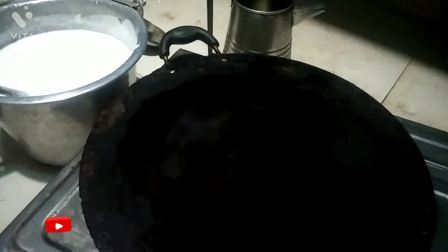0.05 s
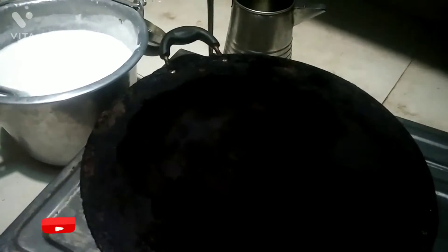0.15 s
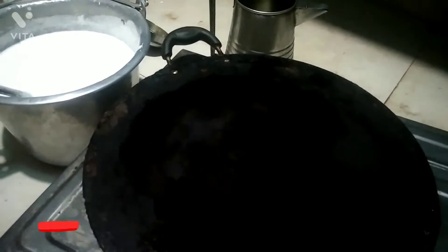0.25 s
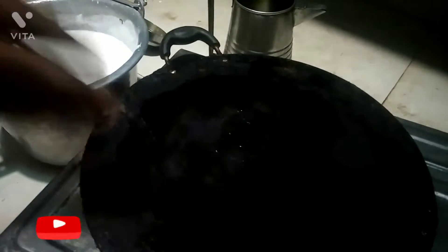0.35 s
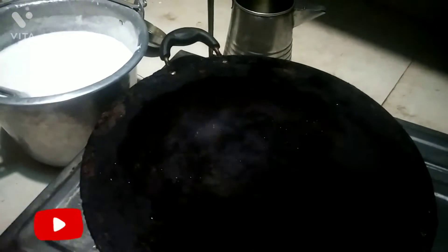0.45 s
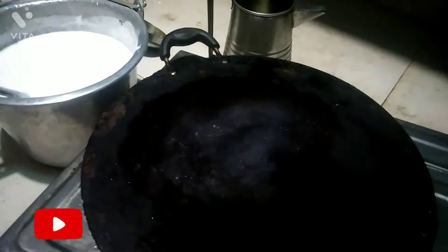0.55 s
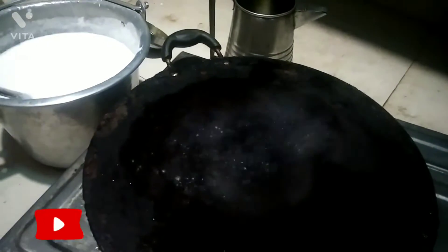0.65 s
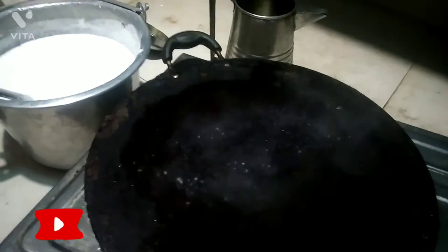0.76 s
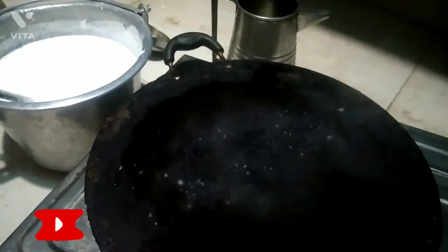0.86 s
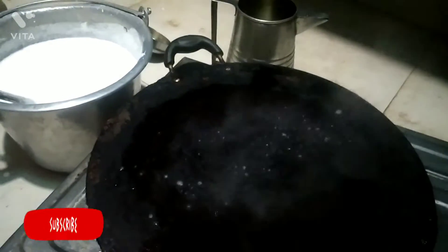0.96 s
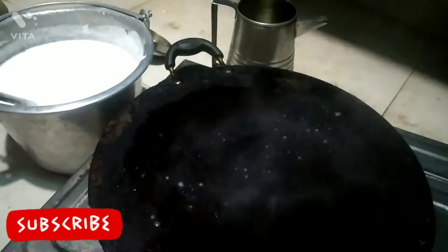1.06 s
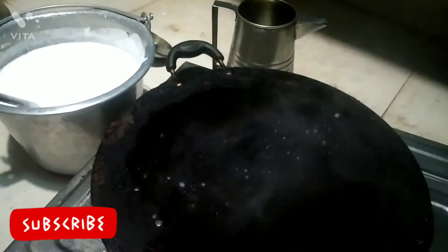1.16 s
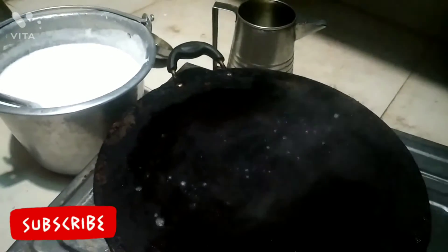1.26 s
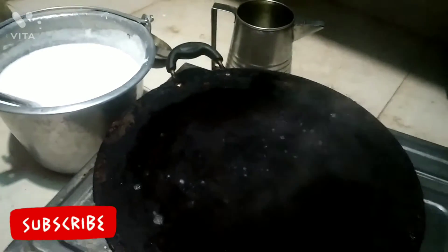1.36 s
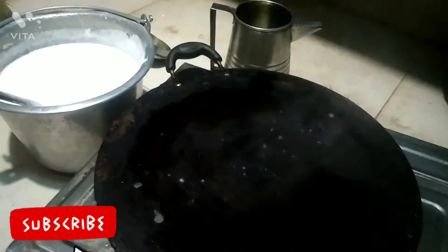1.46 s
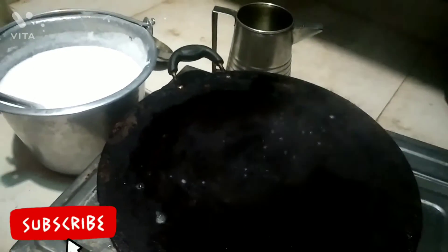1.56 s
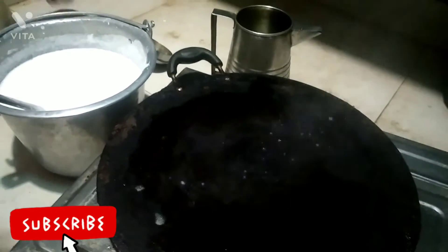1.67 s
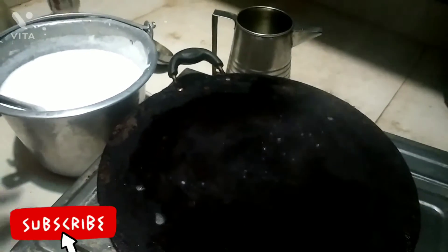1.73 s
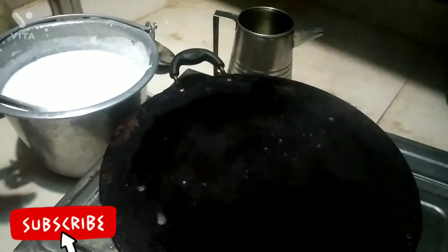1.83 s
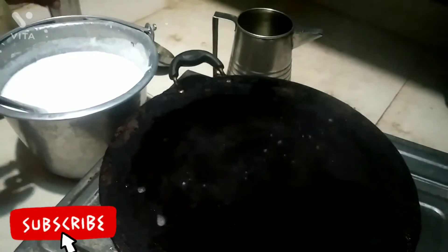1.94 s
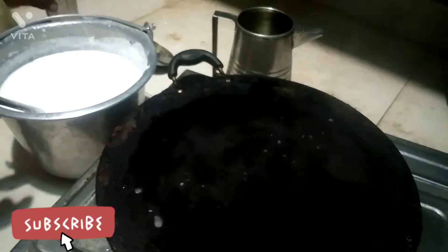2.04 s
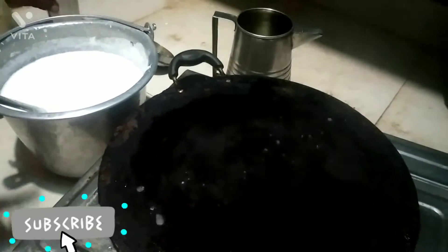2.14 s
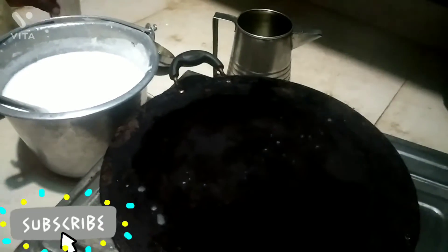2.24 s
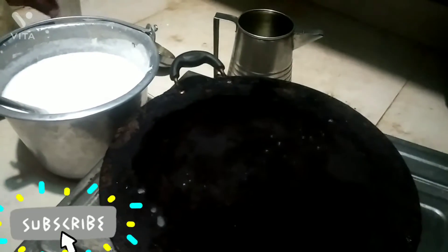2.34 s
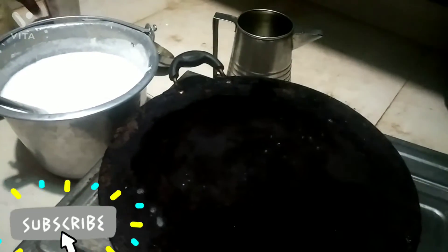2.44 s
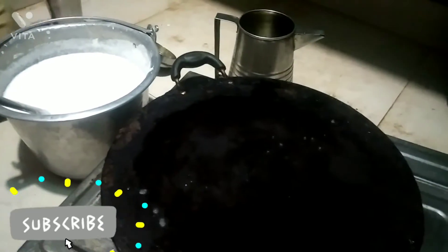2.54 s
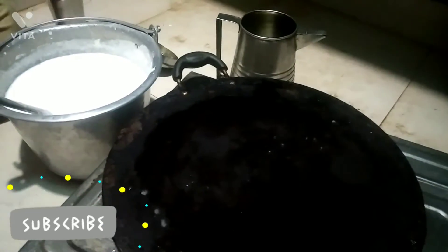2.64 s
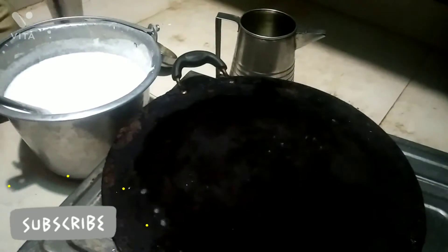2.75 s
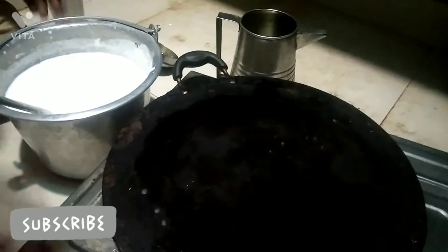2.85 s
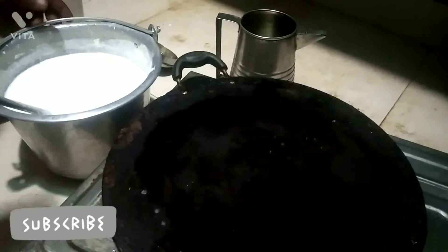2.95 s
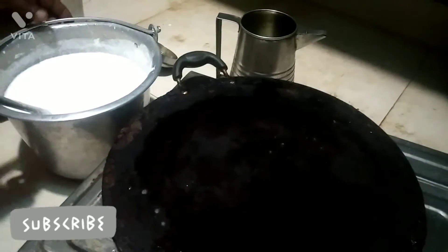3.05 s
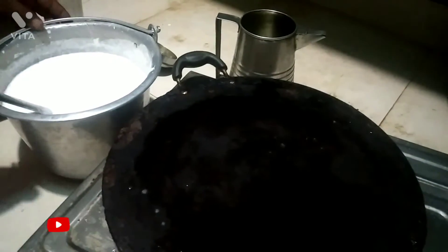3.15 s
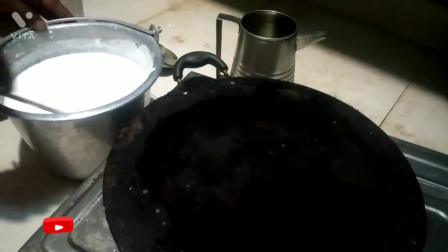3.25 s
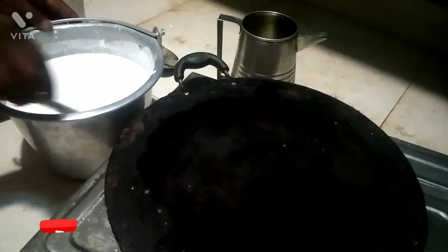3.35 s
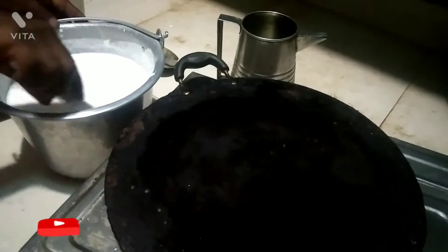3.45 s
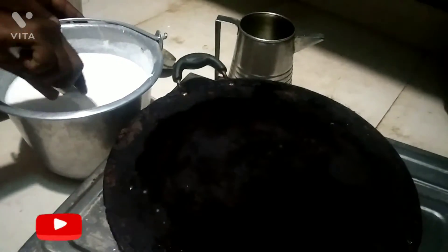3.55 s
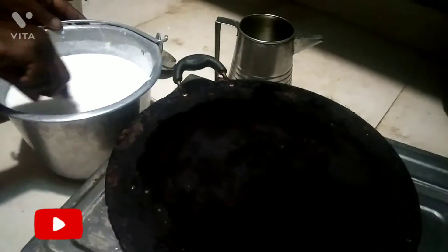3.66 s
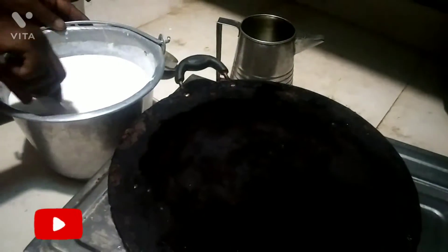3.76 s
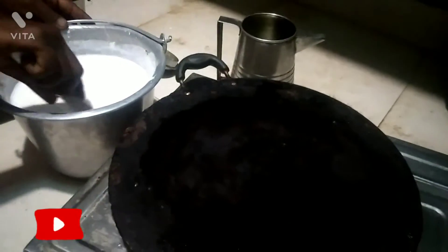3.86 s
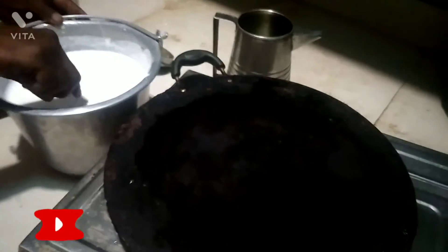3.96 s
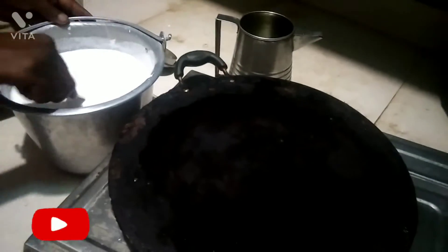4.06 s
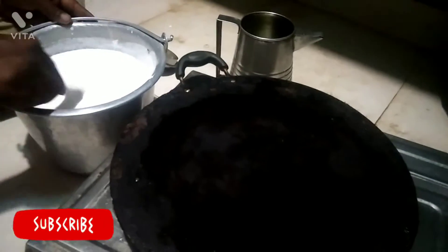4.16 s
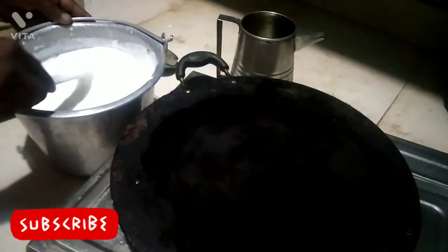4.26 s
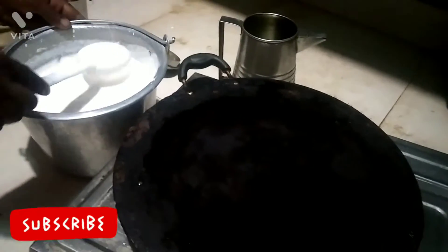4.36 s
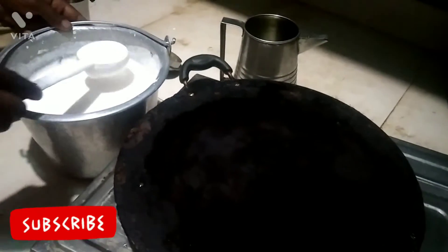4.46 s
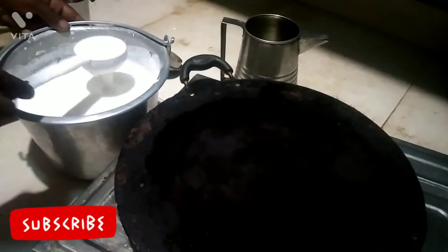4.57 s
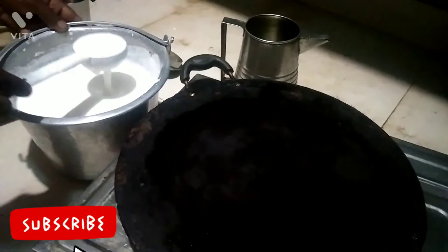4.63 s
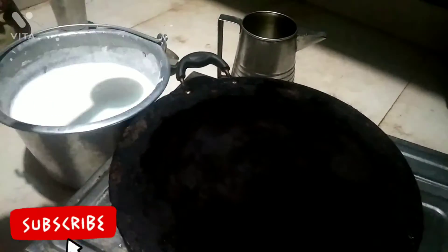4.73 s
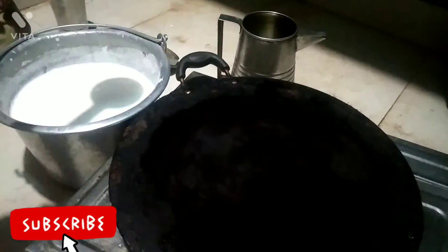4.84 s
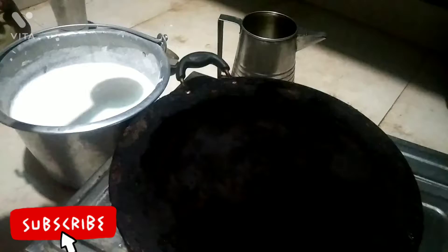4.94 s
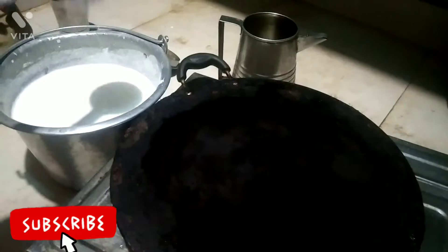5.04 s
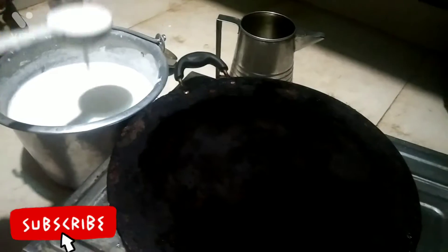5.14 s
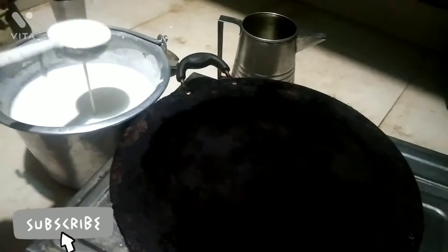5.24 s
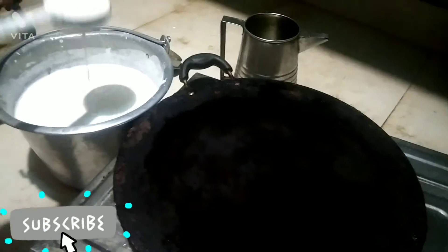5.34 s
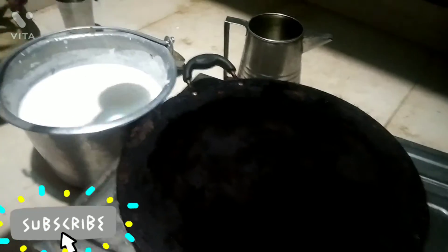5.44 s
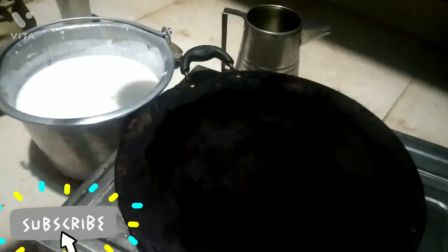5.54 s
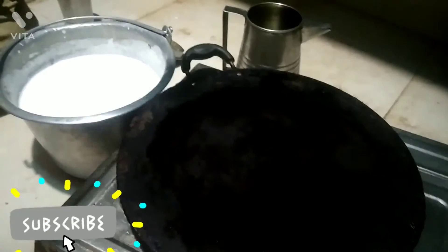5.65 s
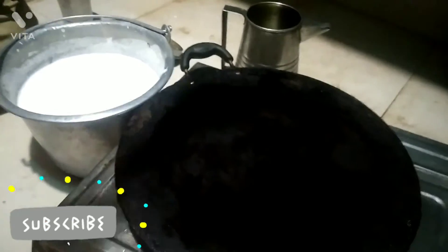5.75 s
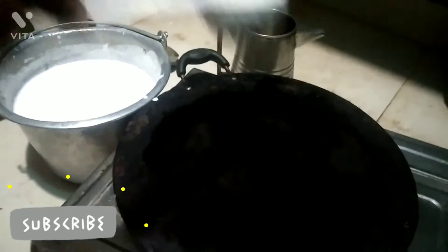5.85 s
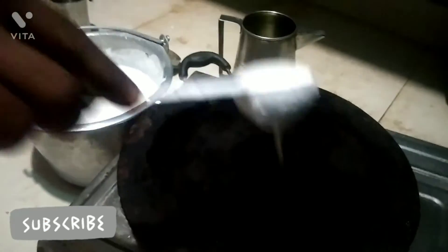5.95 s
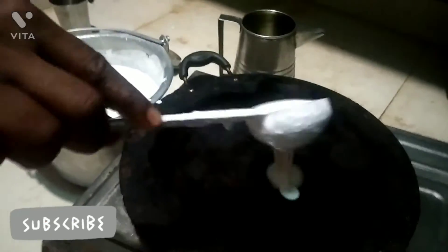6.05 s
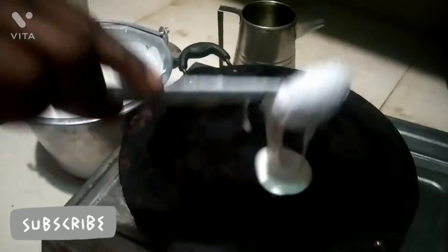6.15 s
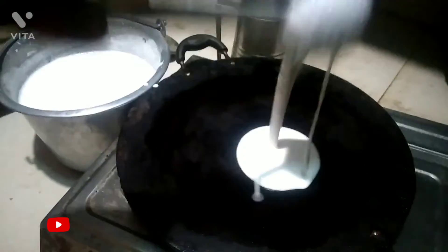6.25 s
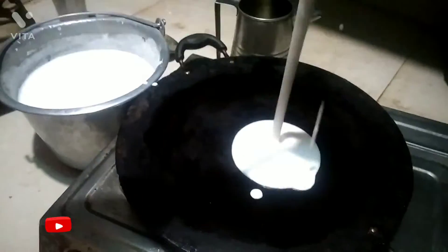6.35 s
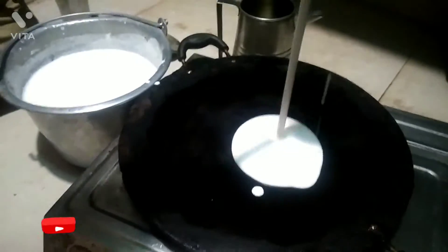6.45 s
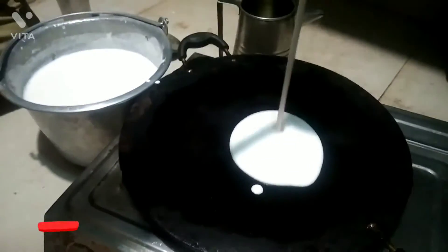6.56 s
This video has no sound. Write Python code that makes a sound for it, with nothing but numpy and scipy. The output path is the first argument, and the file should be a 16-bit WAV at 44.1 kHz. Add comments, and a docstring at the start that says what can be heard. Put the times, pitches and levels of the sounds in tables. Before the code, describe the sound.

Close by in a small tiled kitchen, water hits a hot iron griddle with a loud bright hiss, then dries into separate sharp snaps, dull spits and steam spurts. A ladle knocks a metal pail and batter glugs. After a brief total dropout only faint ticks and a soft throbbing fan remain, until poured batter swells in a duller fizz.

```python
"""Wet griddle, then batter

Small, hard-walled kitchen, hot iron griddle close by: flicked water lands in a hiss of tiny noise bursts,
then thins to single droplets that snap as coloured clicks and spit as dull pops; steam spurts and squeals.
A ladle knocks ringing modes from a steel pail of batter, which glugs in gliding tones; after a brief silence
batter is poured and fries. A fan throbs softly with air noise and hum; late on, a faint far tone wavers upward."""
import sys
import numpy as np
from scipy import signal
from scipy.fft import rfft, irfft, next_fast_len
from scipy.io import wavfile
from scipy.ndimage import uniform_filter1d, map_coordinates

SR = 44100
rng = np.random.default_rng(int(sys.argv[2]) if len(sys.argv) > 2 else 0)


def materialize(psi):
    """Save the field psi as 16-bit PCM at rate SR to the path in sys.argv[1].

    A 1-D psi becomes a single channel; in a 2-D psi each row is a channel.
    """
    bounded = np.clip(np.atleast_2d(psi).T, -1, 1)
    quanta = np.round(bounded * 32767).astype(np.int16)
    wavfile.write(sys.argv[1], SR, quanta)


N = 291060  # length [samples]


def amp(db):
    """Decibels to gain."""
    return 10 ** (np.asarray(db) / 20)


def unit(x):
    """Scale to rms 1."""
    return x / np.sqrt(np.mean(x ** 2) + 1e-20)


def seconds(count):
    """A time axis in seconds."""
    return np.arange(count) / SR


def along(points, hz):
    """Read (Hz, value) points on a log frequency axis."""
    f, v = np.transpose(points)
    return np.interp(np.log(hz + 1), np.log(f + 1), v)


def wobble(rate):
    """A smooth random curve, rate knots a second."""
    knots = rng.standard_normal(int(N * rate / SR) + 4)
    return map_coordinates(knots, [seconds(N) * rate])


def filtered(x, response):
    """Multiply the spectrum of x by a response of frequency."""
    m = next_fast_len(x.shape[-1] + 4096)
    spectrum = rfft(x, m) * response(np.fft.rfftfreq(m, 1 / SR))
    return irfft(spectrum, m)[..., :x.shape[-1]]


def coloured(x, spectrum, size=2048):
    """Minimum-phase colour: the ring follows each click."""
    cepstrum = irfft(np.log(amp(along(spectrum, np.fft.rfftfreq(size, 1 / SR)))))
    cepstrum[1:size // 2] *= 2  # fold the cepstrum to make the filter causal
    cepstrum[size // 2 + 1:] = 0
    kernel = irfft(np.exp(rfft(cepstrum)))
    return signal.fftconvolve(x, kernel[None], axes=1)[:, :x.shape[-1]]


# likeness of the noise at the two microphone ports: (frequency [Hz], likeness [-1 to 1])
PORT_LIKENESS = [(150, 0.28), (900, 0.62), (2000, 0.18), (4200, 0.055), (6000, 0.14), (7500, 0.74),
                 (8300, 0.99), (9500, 0.4), (14000, 0.19)]


def noise(count):
    """White stereo noise, partly alike at the two ports: a shared mid and an opposed side."""
    turn = lambda hz: np.arccos(np.clip(along(PORT_LIKENESS, hz), -1, 1)) / 2
    shares = lambda hz: np.array([np.cos(turn(hz)), np.sin(turn(hz))])
    mid, side = filtered(rng.standard_normal((2, count)), shares)
    return np.array([mid + side, mid - side])


def add(track, s, sound):
    """Mix a sound in at time s."""
    part = track[:, max(round(s * SR), 0):][:, :sound.shape[-1]]
    part += sound[..., :part.shape[-1]]


def panned(db):
    """Left and right gains for a left-right difference."""
    return amp(np.array([db, -db]) / 2).reshape(2, -1)


def patchy(x, depth_db):
    """Patches of time and pitch come out stronger or weaker at random."""
    z = signal.stft(x, nperseg=512)[2]
    field = rng.standard_normal(z.shape[1:])
    field = uniform_filter1d(field, size=3, axis=0)
    field = uniform_filter1d(field, size=3, axis=1)
    return signal.istft(z * amp(depth_db * unit(field)), nperseg=512)[1][:, :N]


def bubbles(rate, spread_db, life, steam_db, spectrum, patchy_db):
    """Tiny bursts of uneven size at random times over smooth steam; rms 1."""
    sizes = amp(spread_db * np.clip(rng.standard_normal(N), -3, 2))
    bursts = (rng.random(N) < rate / SR) * sizes ** 2 / rate
    power = signal.lfilter([1], [1, -np.exp(-1 / (life * SR))], bursts)
    envelope = np.sqrt(power / power.mean() + amp(steam_db) ** 2)
    return unit(coloured(patchy(noise(N), depth_db=patchy_db) * envelope, spectrum))


def chirps(rows, rough):
    """Short gliding tones that swell and fade; rough is the unsteadiness of their pitch."""
    out = np.zeros(N)
    for s, db, hz, glide, rise, t60 in rows:
        t = seconds(N) - s
        pitch = (hz + glide * t) * (1 + rough * wobble(500))
        level = db - 60 * np.maximum(-t / rise, t / t60)
        out += amp(level) * np.sin(2 * np.pi * np.cumsum(pitch) / SR)
    return out


# colour of the fan's air: (frequency [Hz], level [dB])
FAN_AIR = [(18, -53), (30, -23.5), (75, -9), (143, -7.5), (247, -6), (288, 4), (355, -2.5), (754, -4),
           (1240, -15.5), (1730, -8.5), (3780, -12.5), (4540, -21.5), (5730, -31), (7830, -19),
           (13900, -34.5), (15000, -42.5)]
# hum of the fan motor: (frequency [Hz], mean level [dB])
MOTOR_HUM = [(99, -70.5), (148, -68), (199, -67), (1728, -73.5)]


def fan():
    """Each passing blade swells the low rush of air; the motor hums."""
    t = seconds(N)
    air = unit(coloured(patchy(noise(N), depth_db=3.0), FAN_AIR))
    blade = np.cos(2 * np.pi * 9.1 * (t - 5.445))  # 9.1 blades a second
    low_rush = [(70, -15), (150, -2.0), (210, 2), (300, 2.0), (450, -2.5), (700, -14.0), (1300, -27.0)]
    whoosh = unit(coloured(noise(N), low_rush))
    throb = amp(-64.5 + 5.2 * blade + 1.6 * wobble(7))
    hum = sum(amp(db + 1.3 * wobble(5.2)) * np.sin(2 * np.pi * hz * t + .8 * wobble(5.0))
              for hz, db in MOTOR_HUM)
    return amp(-57.5) * air + throb * whoosh + hum


# bigger drops that spit: (time [s], level [dB], left-right [dB], ring [0-1])
SPIT_DROPS = [(0.165, -31, 2, 0.26), (1.008, -15.5, 5, 0), (1.086, -12, -5, .1), (1.212, -14, -6, 0),
              (1.2714, -12, -4, .1), (1.3149, -10, -4, 0.25), (1.4545, -10.5, -2, 0.2), (1.4822, -10, 4, 0),
              (1.5861, -15, 5, 0.25), (1.6833, -17, -2, 0.07), (1.7173, -8, 3.5, 0), (1.765, -14, 4, 0),
              (1.8628, -15.5, -3, 0), (2.0759, -12, 2, 0.02), (2.345, -20, 0, .1), (2.3685, -16, 0, .4),
              (2.6344, -5.5, -5, 0), (2.7509, -8.5, -4, 0.1), (3.2047, -17.5, 0, .1),
              (3.2808, -11, -4, 0.7), (3.526, -17, -7, 0.12), (4.0915, -15, 6, 0), (4.1677, -17, 1, 0.1),
              (4.2576, -20, 0, 0.36), (4.2965, -17, -2.5, .8), (4.5887, -12, -2, 0.09), (5.7152, -35, 0, 0)]
# colour of their dull pop: (frequency [Hz], level [dB])
POP_COLOUR = [(30, -33.5), (120, -5), (300, -5), (800, 3), (2000, 5.5), (3200, 3), (6000, -3), (12000, -26)]
CAVITY_HZ, CAVITY_T60_S = 2100, 0.0059  # the hollow under a bursting drop


def spits():
    """A big drop bursts with one sharp push and a short spray; the hollow under it may ring for a few cycles."""
    out, t = np.zeros((2, N)), seconds(count=1024)
    cavity = np.sin(2 * np.pi * CAVITY_HZ * t) * amp(-60 * t / CAVITY_T60_S)
    for s, db, pan_db, ring in SPIT_DROPS:
        spray = 0.41 * noise(len(t)) * amp(-60 * t / 0.0046)
        burst = coloured((t == 0) + spray, POP_COLOUR)
        pop = burst / np.abs(burst).max() + 2 * ring * cavity
        add(out, s, amp(db) * panned(pan_db) * pop / np.abs(pop).max())
    return out


# colour of sharp crackles on the iron: (frequency [Hz], level [dB])
CRACKLE_COLOUR = [(300, -41), (1000, -20.5), (2200, -8.5), (3200, -7), (4400, 4.5), (5600, -11.5),
                  (7500, 5.5), (9000, 4), (10000, -2), (12500, -2), (15000, -10.5)]
# colour of the frying batter: (frequency [Hz], level [dB])
FRY_COLOUR = [(240, -42), (400, -19), (567, -17), (804, -6.5), (921, -6), (964, -10), (1520, -8),
              (2510, -1.5), (4530, -3.5), (5950, -15), (7930, -4.5), (10400, -20.5), (13700, -25),
              (15000, -31.5)]
# colour of fine hissing water, also of the simmer, fizz and clack: (frequency [Hz], level [dB])
HISS_COLOUR = [(100, -62), (700, -50), (1500, -45), (3000, -16), (3700, -10.5), (4500, -1), (5000, -12.5),
               (6000, -13), (6800, -4), (7600, -0.5), (8700, -2), (9700, -7), (12000, -8), (14300, -16)]
TICKS_DB, TICKS_FADE_DB_PER_S = -62.5, 3  # ticking iron; its fade once the silence is over
POUR_S, POUR_FILL_S, POUR_DB = 6.071, 0.47, -34.5  # batter meets the iron, time to spread, level when spread


def batter():
    """The wetted iron simmers and ticks faintly; thick batter then spreads on it with a soft, duller fizz."""
    t = seconds(N)
    sparse = bubbles(90, spread_db=3, life=.0002, steam_db=-8, spectrum=CRACKLE_COLOUR, patchy_db=3)
    drying = np.maximum(t - SILENCE[1], 0)  # the last traces of water dry off
    ticks = amp(TICKS_DB - TICKS_FADE_DB_PER_S * drying) * sparse
    simmer = amp(-65.5 + 2 * wobble(5.4)) * bubbles(
        600, spread_db=9.0, life=0.00069, steam_db=-5.0, spectrum=HISS_COLOUR, patchy_db=2.5)
    wetted = t > SPIT_DROPS[0][0]  # from the first stray drop on
    spread = amp(POUR_DB) * np.clip((t - POUR_S) / POUR_FILL_S, 0, 1) ** 1.66  # louder as the pool widens
    fizz = bubbles(6000, spread_db=4, life=.0004, steam_db=-2, spectrum=FRY_COLOUR, patchy_db=2.8)
    return (t > SPLASH_S) * ticks + wetted * simmer + spread * fizz


# jets of steam from under a drop: (time [s], coarse jet [dB], fine fizz [dB], 60 dB decay [s])
STEAM_SPURTS = [(0.17, -56.5, -59, 1.8), (2.636, -27.5, -38, 0.86), (2.751, -29, -28, 0.22),
                (3.198, -27.5, -28, 0.28), (3.282, -25, -28, 0.3), (3.529, -31.5, -25, 0.18),
                (4.093, -33, -27.5, .4), (4.205, -29.5, -24.5, 0.11), (4.297, -28.5, -38, 0.32),
                (4.512, -46, -28, 0.31), (4.591, -43, -36, 0.23), (5.067, -51, -48, 0.12),
                (5.168, -61, -41, 0.13), (5.369, -58, -53, 0.12), (5.636, -57, -47, 0.16),
                (5.715, -48, -41, 0.12), (5.774, -57, -45, 0.088)]
# squeals of a skating drop: (time [s], level [dB], pitch [Hz], glide [Hz/s], 60 dB rise [s], 60 dB decay [s])
DROP_SQUEALS = [(1.931, -21, 1141, -1500, 0.01, 0.03), (1.931, -24.5, 2140, 999.5, 0.018, 0.075),
                (1.931, -23, 4200, 500, .025, 0.34), (1.953, -14.5, 4220, 150, .035, .06),
                (1.981, -27, 2190, 1997.5, .03, .03), (1.981, -25, 4270, 400, .025, .04)]
# colour of coarse sputter: (frequency [Hz], level [dB])
SPUTTER_COLOUR = [(40, -54), (150, -38.5), (400, -23), (800, -9), (1050, -10.5), (1500, -6), (2200, 1.5),
                  (2900, -3.5), (4200, -1.5), (5500, -29.5), (9000, -23.5)]


def steam():
    """Trapped steam escapes in rough spurts with a fizz of fine spray, and squeals under a skating drop."""
    t, jets, mist = seconds(N), np.zeros(N), np.zeros(N)
    for s, jet_db, fizz_db, t60 in STEAM_SPURTS:
        fade = amp(-60 * np.abs(t - s) / t60) * (t > s)
        jets += amp(jet_db) * fade
        mist += amp(fizz_db) * fade
    spurts = jets * bubbles(2500, spread_db=-0.5, life=0.0015, steam_db=-14.0,
                            spectrum=SPUTTER_COLOUR, patchy_db=5)
    fizz = mist * bubbles(1800, spread_db=3, life=.0003, steam_db=-7, spectrum=HISS_COLOUR, patchy_db=3)
    return spurts + fizz + chirps(DROP_SQUEALS, rough=.003)


# the film of water: when it lands, how fast it spreads, how long it lasts
SPLASH_S, SPREAD_S, FILM_LIFE_S = .272, .05, 4.25


def wet_share():
    """The share of the film still on the iron: it boils off at a steady rate."""
    return np.clip(1 - (seconds(N) - SPLASH_S) / FILM_LIFE_S, 1e-6, 1)


def contact():
    """The water spreads quickly after it lands."""
    return (1 - np.exp(-np.maximum(seconds(N) - SPLASH_S, 0) / SPREAD_S)) ** 1.51


FLARE_DB, FLARE_GROWS, FLARE_S = -13, 1.21, 0.036  # level after a 0 dB snap, dB per dB of snap, life


def flares():
    """Each snap scatters fragments that boil for a moment, a big drop far more than a small one; a gain."""
    s, db, *_ = np.transpose(SNAP_DROPLETS)
    kicks = np.bincount(np.round(s * SR).astype(int), amp(FLARE_GROWS * db + FLARE_DB) ** 2, N)
    return np.sqrt(signal.lfilter([1], [1, -np.exp(-1 / (FLARE_S * SR))], kicks))


PING_HZ, PING_HZ_SCATTER, PING_CYCLES = 8100, 0.064, 61  # pitch, its log scatter, cycles to fade 60 dB


def pings(count):
    """Tiny bubbles each ring briefly at a pitch of their own; they get rarer as the film dries; rms 1."""
    t = seconds(count=256)
    when, size = rng.random((2, count))
    high, side = rng.standard_normal((2, count))
    times = SPLASH_S + FILM_LIFE_S * (1 - np.sqrt(when))
    cycles = PING_HZ * np.exp(PING_HZ_SCATTER * high)[:, None] * t
    rings = size[:, None] * np.cos(2 * np.pi * cycles) * amp(-60 * cycles / PING_CYCLES)
    at = (times * SR).astype(int)[:, None] + np.arange(len(t))
    channels = [np.bincount(at.ravel(), (gain[:, None] * rings).ravel(), N)[:N]
                for gain in panned(4 * side)]
    return unit(np.array(channels))


# full-film level and the power of the wet share that it follows
HISS_DB, HISS_THINS = -21, 1.03
SPUTTER_DB, SPUTTER_THINS = -31.5, 0.81
CRACKLE_DB, PING_DB, CRACKLE_THINS = -28.5, -33, 0.65
# bursts per second on the full film, power of the wet share; the added rate that nearly dry iron keeps
BURSTS_PER_S, BURSTS_THIN, CRACKLES_PER_S, LAST_BURSTS_PER_S = 4500, 1.5, 500, 300


def water():
    """As the film dries the boiling gets quieter and its bursts sparser; sharp crackles stand out of the hiss."""
    wet, flare = wet_share(), flares()
    rate = BURSTS_PER_S * wet ** BURSTS_THIN + LAST_BURSTS_PER_S
    crackle_rate = CRACKLES_PER_S * wet + LAST_BURSTS_PER_S
    surge = contact() * amp(1.26 * wobble(80) + 0.95 * wobble(14))
    fine = bubbles(rate, spread_db=3.8, life=0.00028, steam_db=-5, spectrum=HISS_COLOUR, patchy_db=3.4)
    coarse = bubbles(.4 * rate, spread_db=4.8, life=0.0003, steam_db=-7,
                     spectrum=SPUTTER_COLOUR, patchy_db=2)
    cracks = bubbles(crackle_rate, spread_db=3, life=.00012, steam_db=-30,
                     spectrum=CRACKLE_COLOUR, patchy_db=3)
    hiss = np.hypot(amp(HISS_DB) * wet ** HISS_THINS, flare) * fine
    sputter = np.hypot(amp(SPUTTER_DB) * wet ** SPUTTER_THINS, amp(-12) * flare) * coarse
    crackle = wet ** CRACKLE_THINS * (amp(CRACKLE_DB) * cracks + amp(PING_DB) * pings(count=2200))
    return surge * (hiss + crackle + amp(.9 * wobble(45)) * sputter)


# the loudest droplets bursting on the iron:
# (time [s], level over 2 ms [dB], pitch [Hz], extra body [dB], extra top [dB], left-right [dB])
SNAP_DROPLETS = [(0.4813, -14, 8630.0, -9.0, -6.0, -1), (0.5255, -18.0, 7500, -11.0, -10.0, -5.0),
                 (0.5625, -24, 8420.0, -10.0, -3.0, -5), (0.7048, -20, 8140.0, -4.0, -10.0, -5),
                 (0.7199, -20, 8160.0, -3, -10.0, -2.0), (0.7819, -24, 8400.0, -7, -11.0, -2.0),
                 (0.9196, -14, 8070.0, -2, 0.0, -4.0), (0.9268, -16, 8590.0, 3, 2.0, -2.0),
                 (0.9782, -19, 8250.0, 2, -4, -2.0), (1.0174, -23, 7690.0, 1, -9.0, -2.0),
                 (1.048, -19, 7130.0, 11, -8.0, -4), (1.0677, -16.5, 7410.0, 10, -1.0, 1.0),
                 (1.0867, -29, 7970.0, -3, -1.0, -4), (1.1045, -25, 7430.0, 2, -10.0, -2.0),
                 (1.1166, -23, 8420.0, 8.0, 1, -4), (1.1466, -24, 7580.0, -1.0, -7.0, -3),
                 (1.1851, -15, 7470.0, -8, 4, -2.0), (1.235, -17.0, 7970.0, 2, -5.0, -3.0),
                 (1.2436, -20, 8550.0, 5, -11.0, -1.0), (1.2509, -18, 7640.0, 3, -12.0, 0),
                 (1.3008, -24, 8610.0, 0.0, -6.0, -6), (1.315, -20, 8160.0, 11, -7.0, 0.0),
                 (1.3313, -23, 8890.0, 7, -8.0, 2.0), (1.3379, -22, 7950.0, 0, -8.0, -2),
                 (1.4273, -18.5, 7690.0, 2, -11.0, -6.0), (1.4554, -21, 7210.0, -10, -11.0, -6.0),
                 (1.483, -14, 7840.0, 4, -12.0, 3), (1.542, -15.5, 9070.0, 1, -5, -2),
                 (1.5843, -16, 7770.0, 4.5, -10.0, -3.0), (1.638, -20, 7490.0, -7.0, -11.0, -4),
                 (1.6547, -21.0, 7690.0, 7, -11.0, -6), (1.7177, -15.5, 8480.0, 6.5, -5.0, 2),
                 (1.8637, -21, 7490.0, 2.0, -1, 1.0), (2.0212, -19.0, 7730.0, -7, 3, -3.0),
                 (2.0767, -22, 7820.0, 8, 1.0, 9), (2.1508, -22, 7450.0, 3, -6, -7),
                 (2.1666, -18.5, 7470.0, 4, 1, -8), (2.1748, -22, 8480.0, 1, -4.0, -4.0),
                 (2.2439, -21.0, 8550.0, 4, 4.0, 0.0), (2.3085, -25, 8100.0, -12.0, -10.0, -2.0),
                 (2.3193, -16, 7430.0, 1.5, -8, 1), (2.3448, -22.0, 7080.0, 6, -9.0, -3),
                 (2.3676, -18.0, 8250.0, 0, -2.0, 2.0), (2.4022, -27, 7580.0, -4.0, -5.0, 4),
                 (2.4073, -22, 7410.0, 14, 4, -2), (2.4972, -24, 8810.0, -2.0, 7, 5),
                 (2.5069, -31, 8680.0, -7, 7, -1), (2.5206, -27, 8290.0, 5.0, 6, 3),
                 (2.5494, -24, 7580.0, -7.0, -2.0, -2.0), (2.5586, -23, 8480.0, 0.0, -6.0, 0.0),
                 (2.571, -20.0, 7430.0, -5.0, -2.0, 1.0), (2.6346, -14.5, 8850.0, 13, -6, 1.0),
                 (2.751, -21, 7540.0, -1, -5, 1), (2.818, -18, 7390.0, 8, 0, 1),
                 (2.904, -25, 7600.0, 11, -1.0, -2.0), (2.9119, -22.0, 8680.0, 7, 6.0, -1.0),
                 (2.943, -21, 7600.0, -2.0, -4.0, -2.0), (2.9888, -23, 8790.0, -1, -2.0, 1.0),
                 (2.9983, -22, 7860.0, 0.0, -2.0, -1.0), (3.0223, -17, 7350, 2.5, -1.0, 3),
                 (3.1124, -17.5, 9240.0, -1.0, 6, 2), (3.155, -18.5, 7880.0, -4, -7, -1.0),
                 (3.1724, -17, 7880.0, -4, -5, -1), (3.1977, -22, 7820.0, 1.0, -3.0, -6),
                 (3.206, -24, 8870.0, 3, 3, 5), (3.2744, -21, 7560.0, 6, 4, 1.0),
                 (3.2813, -22, 7360.0, 12.0, 12.0, 6), (3.3522, -22.0, 7410.0, -3, -2.0, 0.0),
                 (3.4194, -19.5, 9110.0, -3, 3, 3), (3.473, -19, 7690.0, 0.5, 0.0, -3),
                 (3.5008, -20, 7620.0, -3, -5.0, 0.0), (3.5265, -22.5, 7560.0, 3, 1.0, -1.0),
                 (3.5323, -21, 7730.0, 6, -4, -4.0), (3.5495, -20, 8530.0, -1.0, -7.0, 4),
                 (3.5862, -21, 8740.0, -6.0, 3, 6.0), (3.643, -20.5, 8790.0, -6.0, 6, 3.0),
                 (3.6517, -20.0, 8250.0, -2.5, 4, -4), (3.6931, -22, 7560.0, 1.0, 1.0, 2),
                 (3.708, -24, 9020.0, 7, 3.0, 5), (3.7152, -21, 8440.0, 3, 1, 0),
                 (3.7362, -18, 7770.0, 2, -3, 1), (3.7605, -23.0, 8660.0, -1, 3.0, 0),
                 (3.7953, -24, 8230.0, -13, 0, -1.0), (3.8277, -18, 7600, -3, 5, 2),
                 (3.8848, -20, 8350.0, 0.5, 7, 1), (3.891, -20.5, 9000.0, -9, 3.0, 0),
                 (3.9583, -25, 8310.0, -3, 9.0, 1.0), (3.9648, -19.5, 7580.0, -0.5, -2.5, -1.5),
                 (3.9901, -26.5, 8250, 2.0, -5.0, 4.5), (4.0322, -23.5, 8440.0, 0.0, 1.5, 0.5),
                 (4.0614, -24.0, 8530.0, 0, 2.0, 1.0), (4.0717, -24.0, 9040.0, -4, -1.5, 0.5),
                 (4.0923, -14.0, 7300, 4, 0.5, 0.0), (4.1434, -19.5, 7690.0, -5, 5, 1.5),
                 (4.1677, -16, 7600.0, 7, 3.5, -0.5), (4.2173, -20, 8590.0, -4.0, -8, -1),
                 (4.259, -22, 8700.0, 0.5, -4.5, 1.0), (4.2966, -16, 8300, 12.5, 4, -3),
                 (4.3527, -21, 7240.0, 0.5, 5, 1), (4.361, -25.5, 7500, -2.5, -4, -1.5),
                 (4.396, -17.5, 7520.0, 0, -0.5, 0.5), (4.407, -30, 8870.0, -10.0, 5.0, 1.0),
                 (4.42, -29.0, 8910.0, -3.0, -3.0, 0.0), (4.4927, -19.5, 8000, 4, 6.5, 4.0),
                 (4.5095, -17.0, 7670.0, -2.5, 1.0, 0.0), (4.517, -28.5, 9000, 1, -12.0, 2.5),
                 (4.5348, -16.5, 8290.0, -0.5, 0, -0.5), (4.5672, -26, 8720.0, -6.5, -5.0, 1.0),
                 (4.5895, -23.0, 8180.0, 1, 6.5, 1), (4.8454, -45.0, 7430.0, 4.0, 3.0, 0.0),
                 (4.8702, -40.5, 8830.0, 2, -3.0, 0.0), (4.8965, -45, 7800.0, -3, 2.0, -1.0),
                 (4.9707, -46, 8980.0, -12.0, 5, 0.0), (5.0069, -45, 8700.0, -7.0, 0, 3.0),
                 (5.0273, -45, 8030.0, -10.0, 5.0, -1.0), (5.0669, -37.5, 7040, 1.0, 1, -1),
                 (5.1188, -47, 8700.0, -3.0, 4.0, 1.0), (5.1671, -40, 8610.0, 1, 6, 6),
                 (5.1764, -44, 7970.0, -2.0, 4.0, -2.0), (5.1812, -49.0, 7170.0, 6, 12, 1.0),
                 (5.24, -47, 8440.0, 4.0, 11.0, 6), (5.2577, -47.0, 7800.0, -5.0, 5.0, 2.0),
                 (5.2733, -48, 8850.0, -5, 0.0, 5.0), (5.3672, -35.5, 7300, -3, -3, 2),
                 (5.4197, -43.0, 8740.0, -10, -1.0, -1.0), (5.4544, -49, 8850.0, -8.0, 1.0, 4.0),
                 (5.5846, -46.5, 8100.0, 4, 4.0, 0.0), (5.6342, -35, 7280.0, 4, -5.0, 2),
                 (5.7072, -29.0, 8230.0, 0, -2, 4), (5.7155, -32.0, 7300.0, 9, 4, 3),
                 (5.724, -40.0, 8140.0, 4, -8.0, 2.0), (5.7732, -39.5, 8230.0, 5, -5, -2),
                 (5.8549, -44.5, 9150.0, 4, 2, 6), (6.002, -49, 7620.0, 3, -3.0, 4),
                 (6.1134, -43, 7520.0, 7, 0.0, -1), (6.1613, -40.5, 7190.0, 13, 5.0, 2)]
# colour shared by the cracks: (frequency [Hz], level [dB])
CRACK_COLOUR = [(200, -19.5), (1000, -14), (2200, -8), (3200, -6.5), (4400, 4.5), (5600, -11.5),
                (7500, 7.5), (9000, 4.5), (10000, -1), (12500, -1.5), (15000, -9)]
# where a snap's extra body and extra top act: (frequency [Hz], share [0-1])
BODY_SHARE = [(5200, 1), (6500, 0)]
TOP_SHARE = [(9300, 0), (10300, 1)]
SNAP_RISE_S, SNAP_T60_S = .0009, .0022  # swelling before the crack, its decay; both over 60 dB
SNAP_RING_DB, SNAP_RING_HZ = 5.5, 500  # height and width of the droplet's own resonance


def snaps():
    """Each droplet swells for an instant and cracks with a colour of its own, then sprays briefly."""
    out, t = np.zeros((2, N)), seconds(count=512) - .003
    hz = np.fft.rfftfreq(len(t), 1 / SR)
    burst = amp(np.minimum(60 * t / SNAP_RISE_S, -60 * t / SNAP_T60_S))
    spray = amp(-23 - 60 * np.abs(t) / .015)
    for s, db, pitch_hz, body_db, top_db, pan_db in SNAP_DROPLETS:
        shared = burst * rng.standard_normal(len(t))
        push = shared + (.5 * burst + spray) * rng.standard_normal((2, len(t)))
        ring = SNAP_RING_DB * np.exp(-((hz - pitch_hz) / SNAP_RING_HZ) ** 2)
        extra = body_db * along(BODY_SHARE, hz) + top_db * along(TOP_SHARE, hz)
        colour = along(CRACK_COLOUR, hz) + ring + extra
        crack = irfft(amp(colour) * np.exp(1j * np.angle(rfft(push))))  # keep only the push's phase
        rms = np.sqrt(np.sum(crack.mean(0) ** 2) / (.002 * SR))
        add(out, s + t[0], amp(db) * panned(pan_db) * crack / rms)
    return out


# puffs of air that hit mostly the left port: (time [s], level before the ports [dB], fade constant [s])
AIR_PUFFS = [(0.533, -38.5, .0007), (.779, -32, .0007), (0.845, -45, 0.00063), (.927, -43, 0.00059),
             (1.017, -35, .0006), (1.074, -41, .0008), (1.126, -42, .0006), (1.252, -32, .0007),
             (1.277, -37, .0007), (1.332, -33, .0006), (1.4823, -21, 0.0022), (1.586, -25.5, 0.00098),
             (1.716, -26, 0.00084), (1.763, -31.5, 0.0009), (2.497, -30.5, 0.00086),
             (2.6345, -14.5, 0.0025), (3.024, -31.5, .0012), (3.119, -38.5, .0012), (4.0925, -43, .0008),
             (4.168, -40, 0.00088)]
PORT_LEAK_HZ = 70  # below this a puff leaks past the port


def puffs():
    """Pressure swells, then snaps over into suction; the deepest part leaks past the port."""
    push = np.zeros(N)
    for s, db, length in AIR_PUFFS:
        u = (seconds(N) - s) / length
        push -= amp(db) * np.tanh(8 * u) * np.exp(-np.abs(u))
    return filtered(push, lambda hz: hz / np.hypot(hz, PORT_LEAK_HZ)) * amp([[3], [-14]])  # left, right dB


# knocks of the ladle on the pail: (time [s], wall [dB], rim [dB])
PAIL_KNOCKS = [(1.928, -72, -25), (3.866, -36, -46), (3.928, -45, -64), (4.204, -68.5, -31)]
# modes of the wall loaded with batter, and of the rim: (frequency [Hz], level [dB], 60 dB decay [s])
WALL_MODES = [(141, 3.5, 0.21), (330, -2, 0.11), (483, -12.5, .12), (804, -7.5, 0.11)]
RIM_MODES = [(626, -14, 0.11), (770, -0.5, 0.034), (852, -5, 0.074), (990, 3, 0.026), (1177, -6, 0.075),
             (1414, 1, 0.06), (2110, -2.5, 0.088), (2260, -7.5, .12)]


def pail():
    """The ladle bumps the wall softly and clacks on the rim; batter damps both."""
    out, t = np.zeros((2, N)), seconds(count=SR // 2)
    ring = lambda modes: sum(amp(db - 60 * t / t60) * np.sin(2 * np.pi * hz * t) for hz, db, t60 in modes)
    thud = ring(WALL_MODES) * np.minimum(t / .004, 1)
    clank = ring(RIM_MODES) * np.minimum(t / 0.0014, 1)
    for s, wall_db, rim_db in PAIL_KNOCKS:
        clack = amp(10.0 - 60 * t / 0.054) * unit(coloured(noise(len(t)), HISS_COLOUR))
        add(out, s, amp(wall_db) * thud + amp(rim_db) * (clank + clack))
    return out


# glugs around the ladle: (time [s], level [dB], pitch [Hz], glide [Hz/s], 60 dB rise [s], 60 dB decay [s])
LADLE_GLUGS = [(4.208, -29, 780, -7000, .012, .042), (4.213, -32, 1030, 1500, .014, 0.039),
               (4.214, -32.5, 1390, -1000, .016, .05), (4.21, -34, 2400, 2000.5, .012, .04)]


def ladle():
    """Batter glugs in gliding tones as the ladle is pulled out of it."""
    return chirps(LADLE_GLUGS, rough=.06)


# a faint far tone: (time [s], level [dB], mean pitch [Hz])
DISTANT_TONE = [(5.85, -71, 505), (5.96, -57.5, 535), (6.03, -68, 532), (6.1, -56, 537), (6.2, -64, 574)]


def far_tone():
    """A faint tone wavers upward in the distance."""
    s, db, hz = np.transpose(DISTANT_TONE)
    level = np.interp(seconds(N), s, db, left=-120, right=-120)
    pitch = np.interp(seconds(N), s, hz) * (1 + 0.013 * wobble(40))
    return amp(level) * np.sin(2 * np.pi * np.cumsum(pitch) / SR)


# decay of the small kitchen: (frequency [Hz], 60 dB decay [s])
KITCHEN_DECAY = [(200, 0.27), (2000, 0.32), (8000, 0.1), (15000, 0.068)]


def kitchen(x):
    """The tiled walls answer with a short tail of noise, shortest in the treble."""
    hz, t, z = signal.stft(rng.standard_normal((2, SR // 2)), SR, nperseg=256)
    fade = amp(-60 * t / along(KITCHEN_DECAY, hz)[:, None])
    tail = signal.istft(z * fade, SR, nperseg=256)[1]
    tail = np.pad(tail, ((0, 0), (130, 0)))  # samples before the first reflection
    return signal.fftconvolve(x, tail / np.linalg.norm(tail[0]), axes=1)[:, :N]


def scene():
    """Griddle and pail close by, the room behind them."""
    frying = water() + steam() + batter()
    hits = snaps() + spits() + pail() + ladle()
    room = amp(-9.5) * kitchen(frying) + amp(-9.5) * kitchen(hits)
    return frying + hits + room + puffs() + fan() + far_tone()


# colour difference of the two microphone ports: (frequency [Hz], left-right [dB])
PORT_COLOUR = [(600, 7), (1200, -5), (2400, 4.5), (3700, -1.5), (4600, -3.5), (6000, 2.5), (7300, -5.5),
               (8100, -3.5), (8900, 9), (10000, 0.5), (14000, 1.5)]
# the brief silence: (start [s], end [s])
SILENCE = (4.619, 4.826)
TOP_HZ = 14400  # band limit


def record(dry):
    """Each port has its own colour; high peaks are rounded off; sound drops out briefly; a steep band limit."""
    t = seconds(N)
    heard = filtered(dry, lambda hz: panned(along(PORT_COLOUR, hz)))
    heard = heard / (1 + np.abs(heard / .8) ** 6) ** (1 / 6)
    live = (t < SILENCE[0]) | (t > SILENCE[1])
    return filtered(heard * live, lambda hz: 1 / np.sqrt(1 + (hz / TOP_HZ) ** 140))


dry = scene()
out = record(dry)
materialize(out)
```